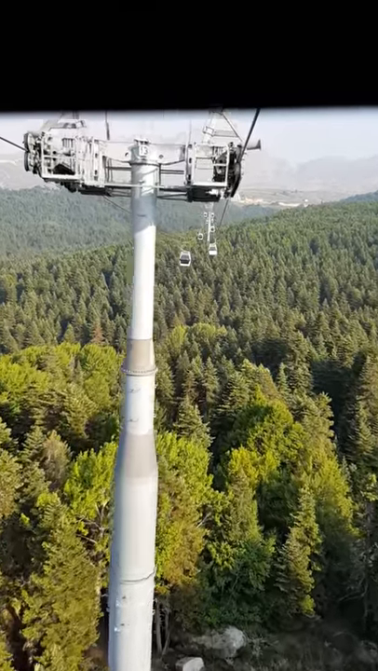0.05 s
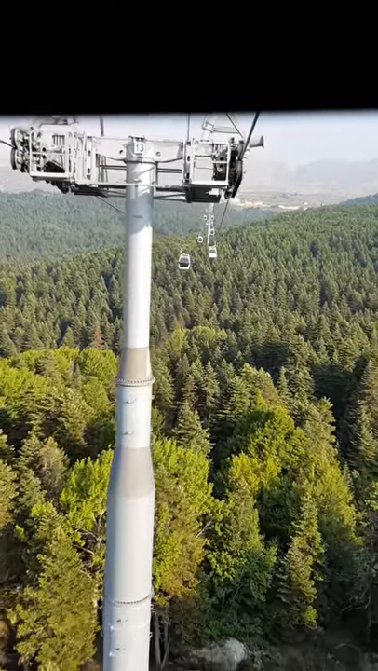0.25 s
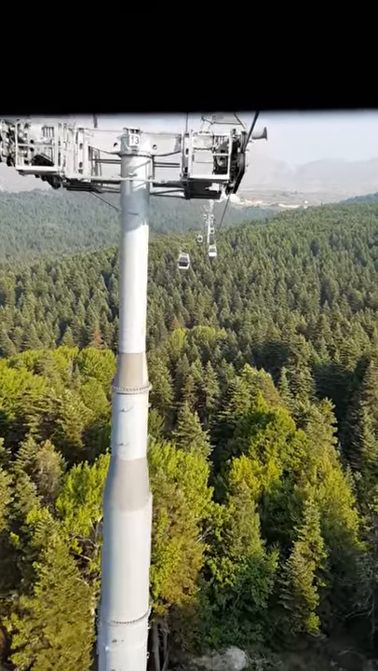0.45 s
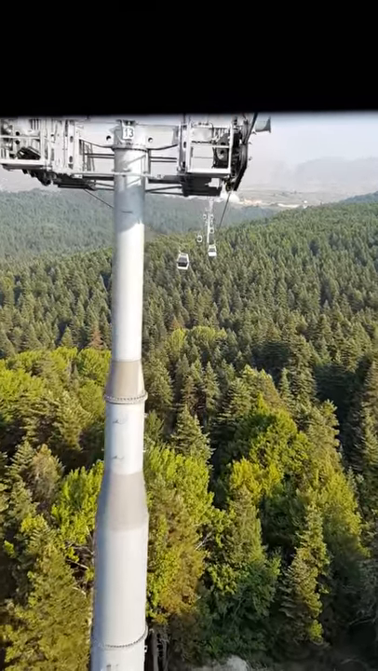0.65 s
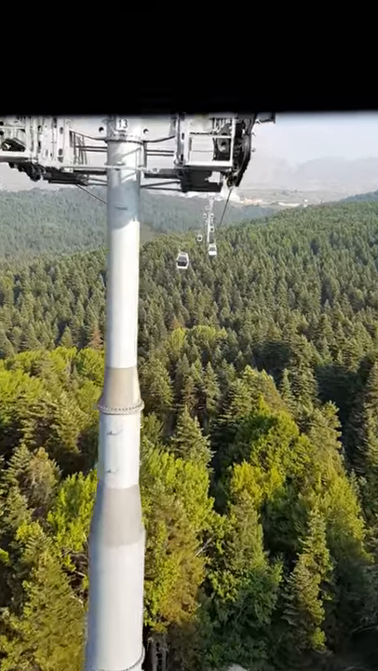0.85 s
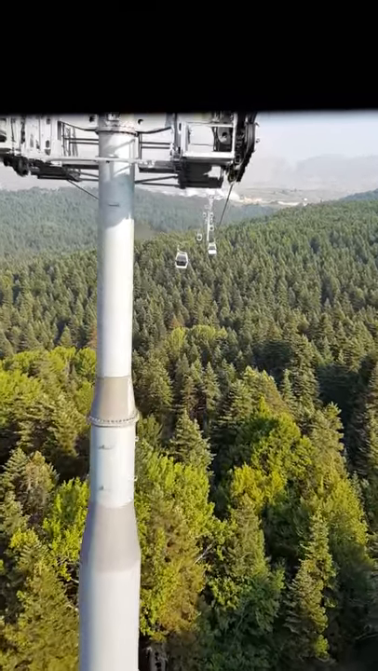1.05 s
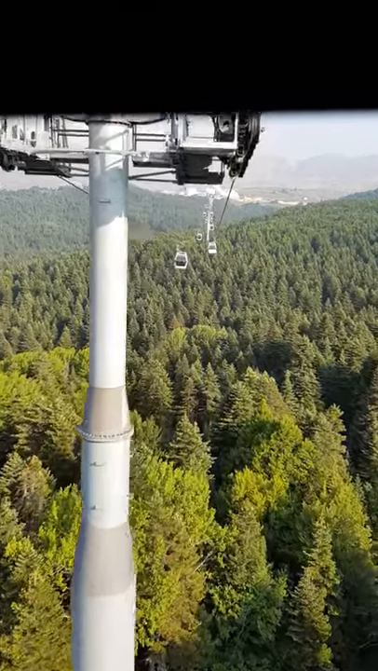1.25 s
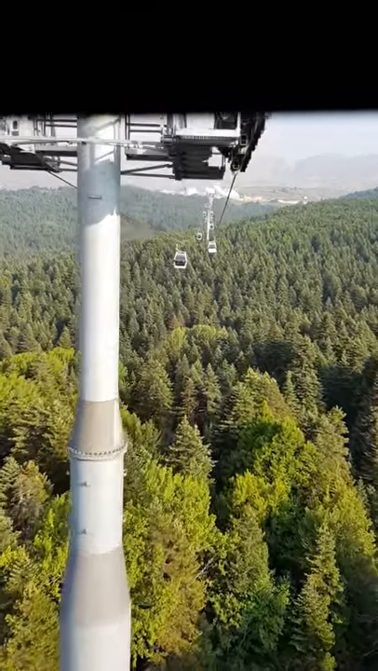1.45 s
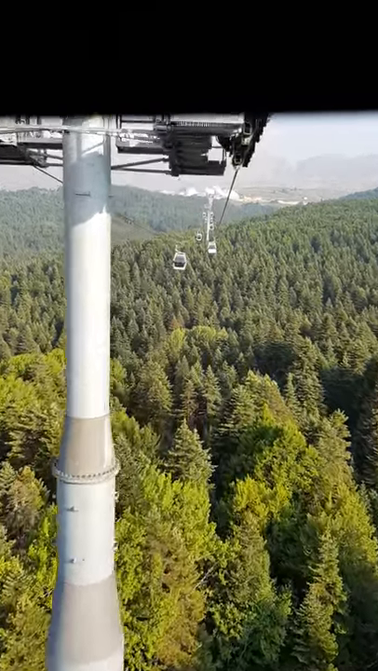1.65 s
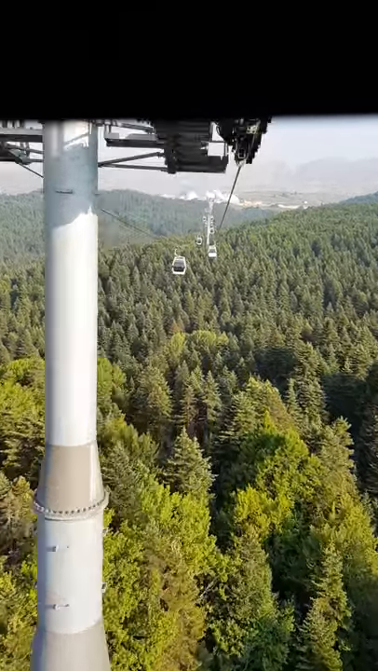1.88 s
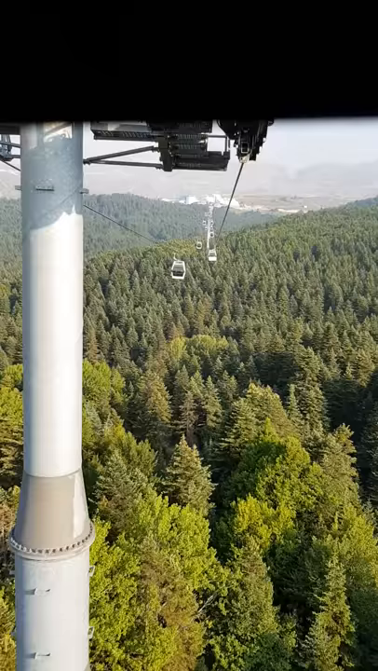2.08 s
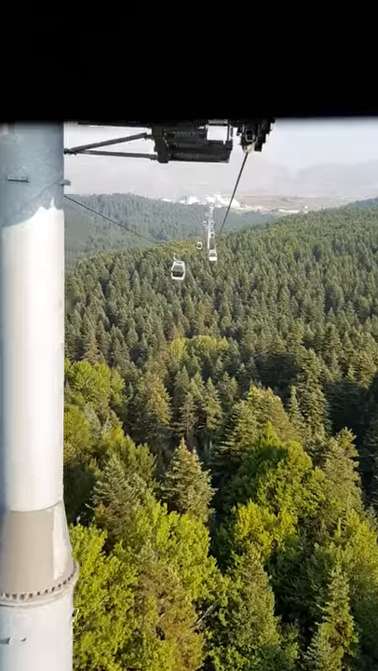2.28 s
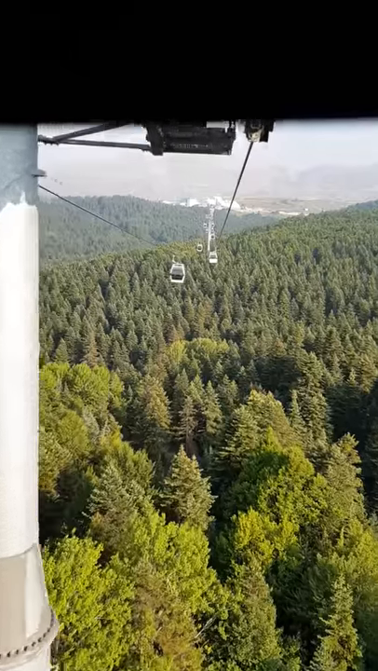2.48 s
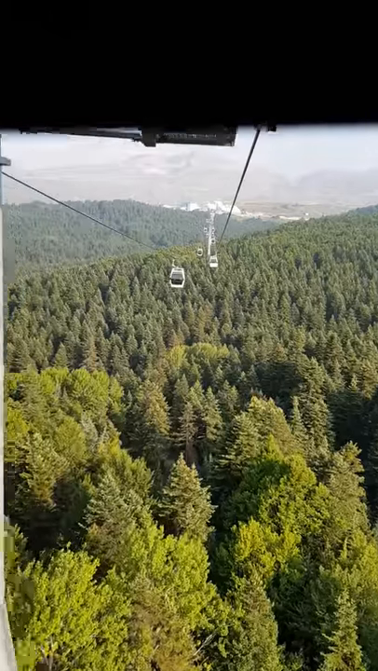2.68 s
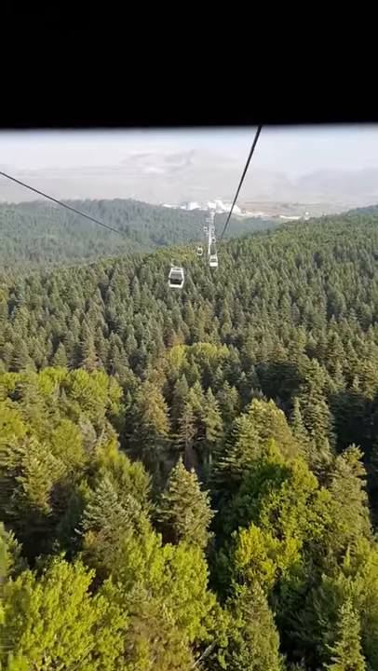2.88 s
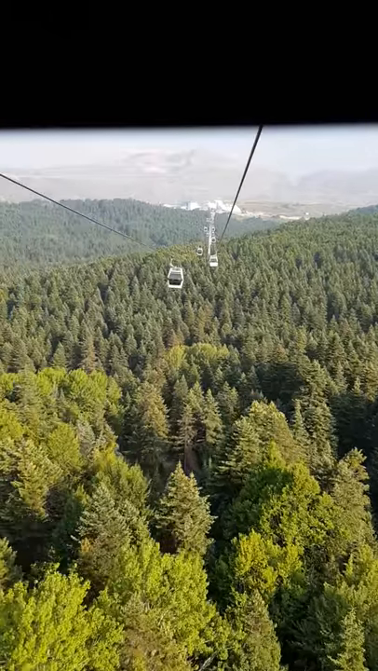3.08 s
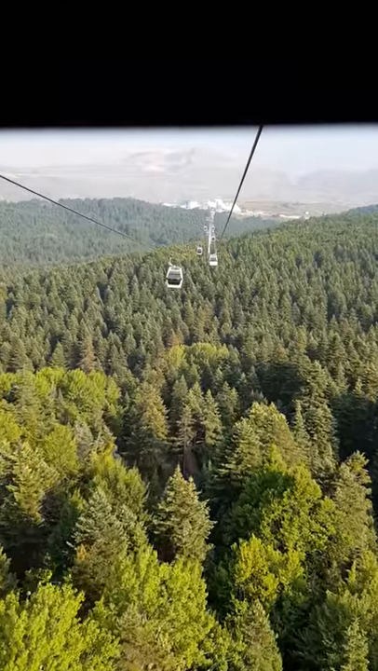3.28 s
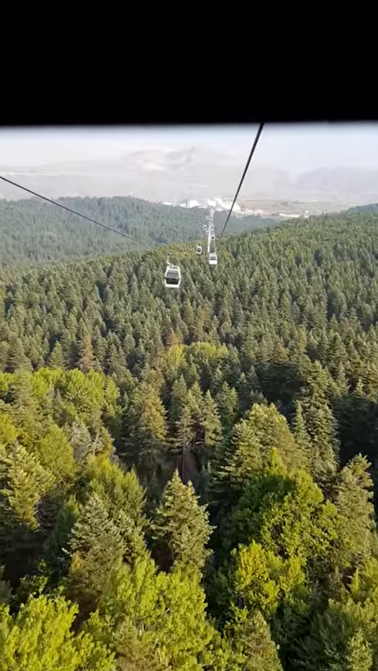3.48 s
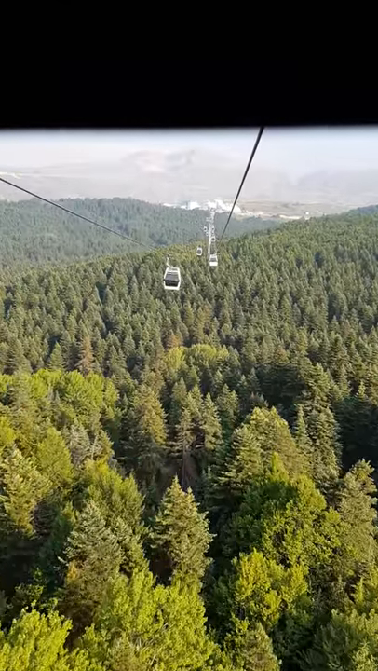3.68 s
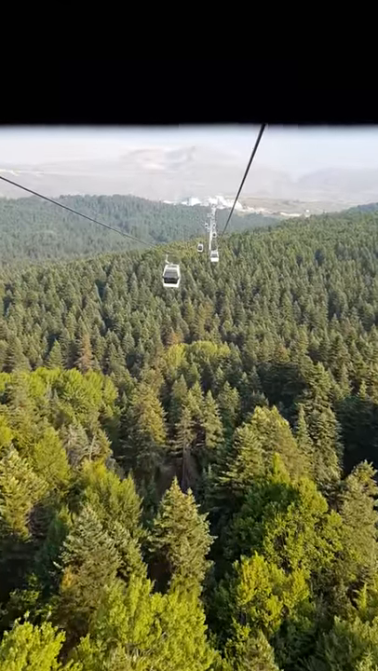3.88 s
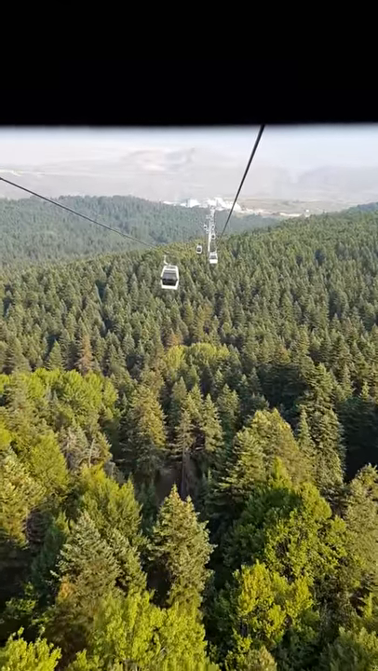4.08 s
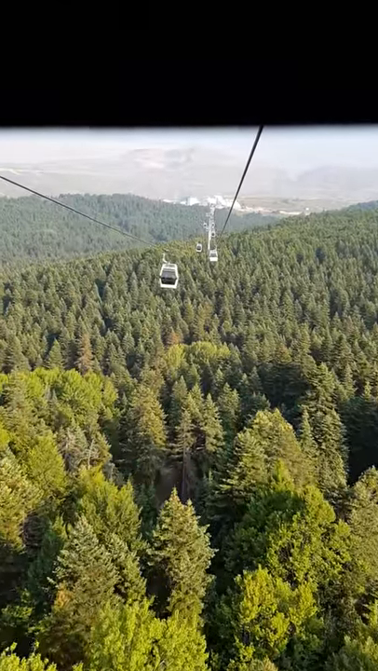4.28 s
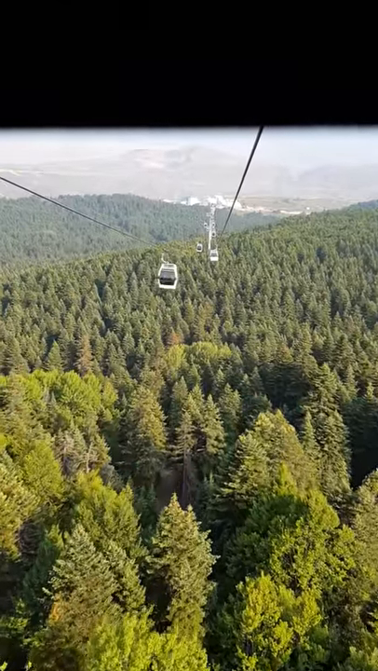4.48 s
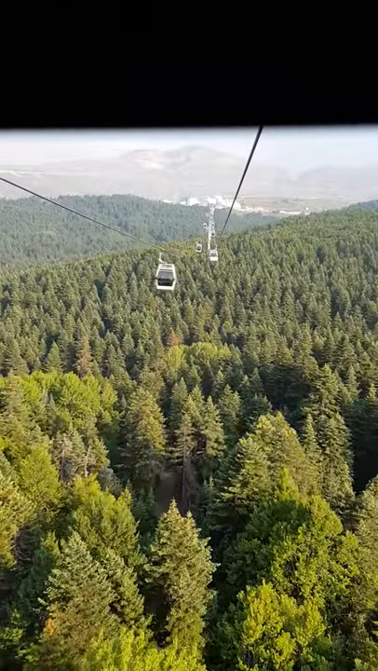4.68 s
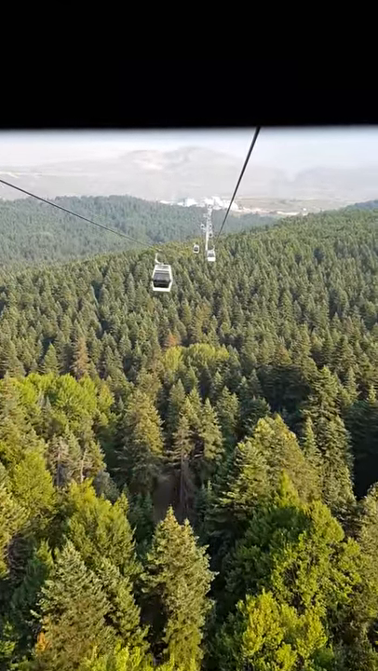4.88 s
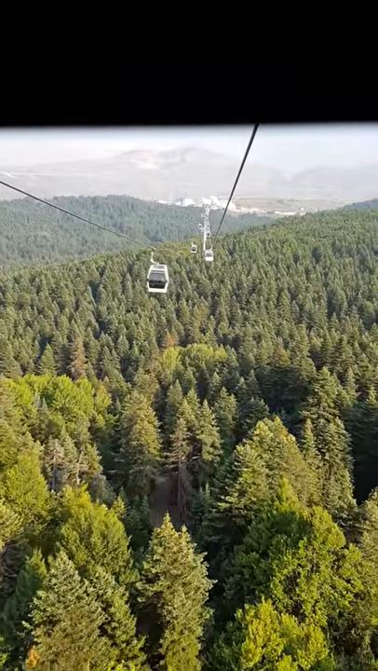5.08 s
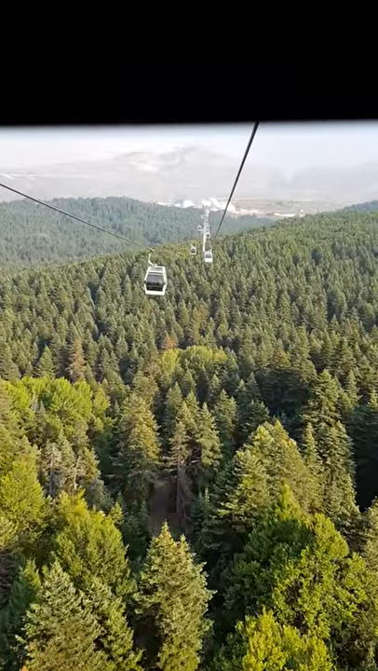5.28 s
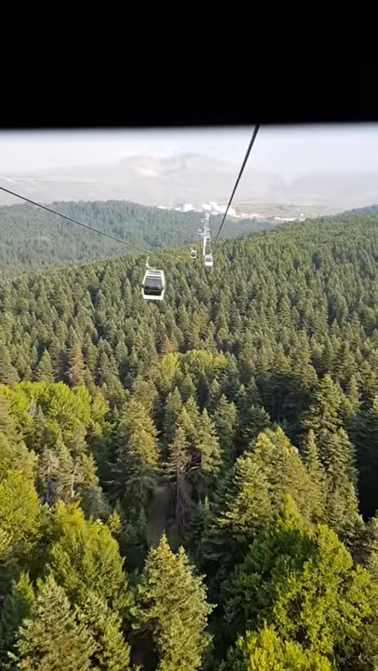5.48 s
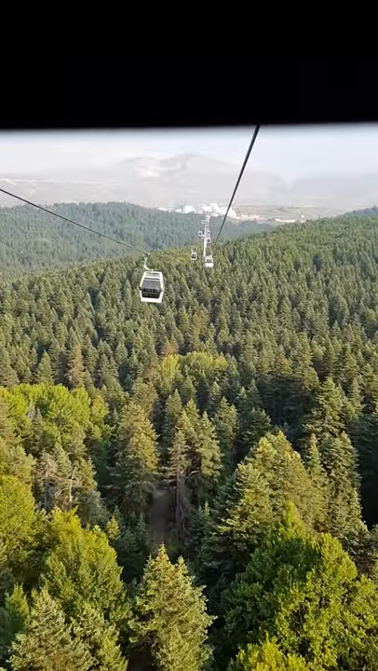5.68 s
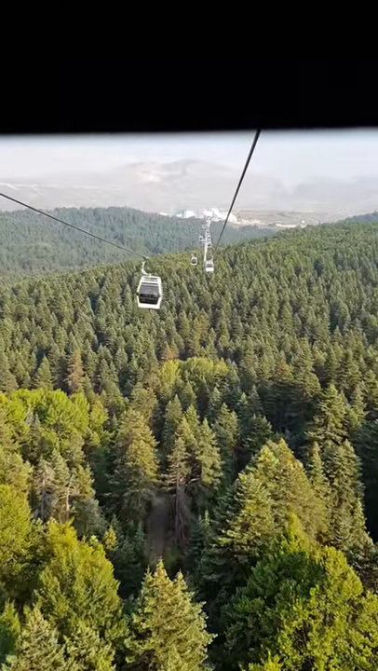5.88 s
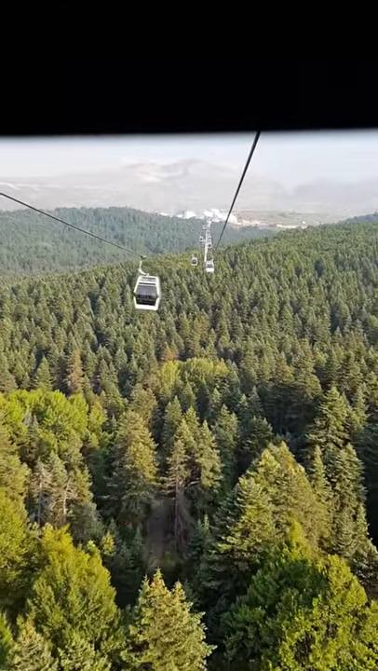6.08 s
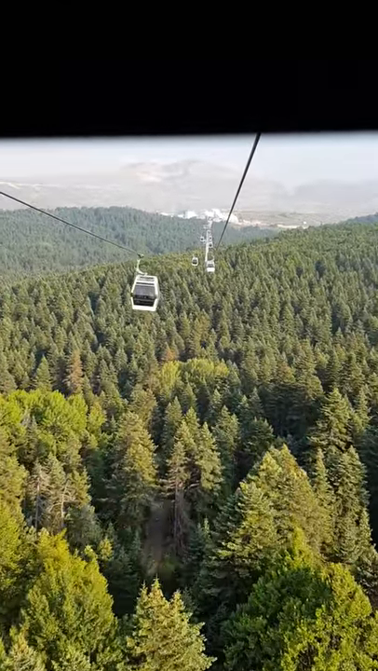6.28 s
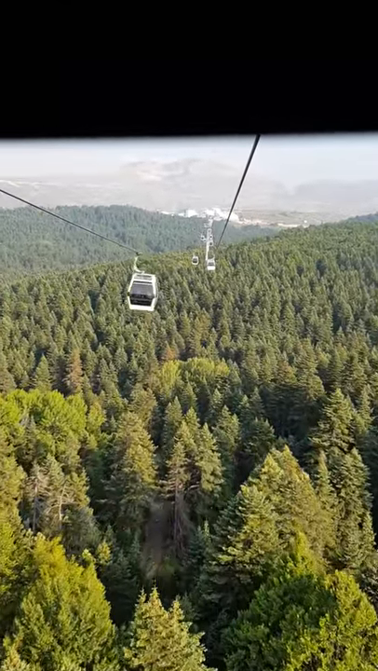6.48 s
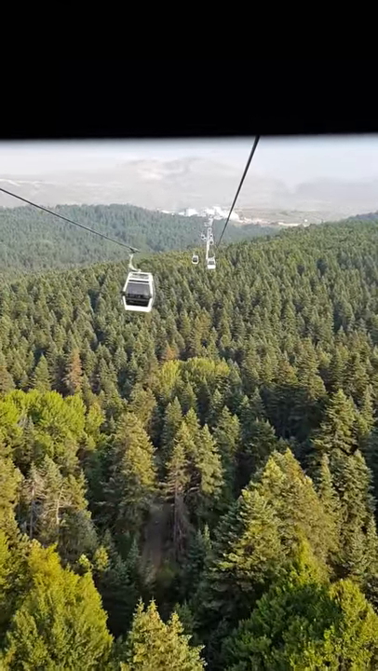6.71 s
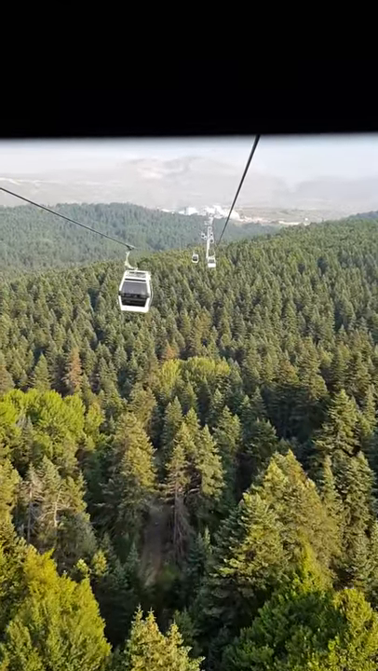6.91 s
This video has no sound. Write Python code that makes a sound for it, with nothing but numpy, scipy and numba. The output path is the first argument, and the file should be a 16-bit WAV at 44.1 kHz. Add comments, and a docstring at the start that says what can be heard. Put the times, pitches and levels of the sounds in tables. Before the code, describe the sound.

A gondola cabin hums toward a support tower, jolts and rattles loudly across the rollers for about a second, then glides on quietly.

```python
"""Cable car riding over a support tower

Inside the cabin, heard by a hand-held phone: the rope hums and the nearing rollers whirr. The grip jolts
across them: pushes ring the shell, small impacts clatter in the frame, fittings rattle, and thin high
tones flicker. Then it grows quiet and a soft rush is left. Noise and pushes through resonances make most
of the sound; the thin tones are wavering sines. The phone's left side lacks bass except now and then."""
import sys
import numpy as np
from scipy import signal
from scipy.fft import rfft, irfft
from scipy.io import wavfile
from scipy.ndimage import uniform_filter1d
from numba import njit

SR = 44100
rng = np.random.default_rng(int(sys.argv[2]) if len(sys.argv) > 2 else 0)


def transcribe(signal):
    """Save signal, clipped to [-1, 1], as a 16-bit WAV file at the path in sys.argv[1]."""
    frames = np.atleast_2d(signal).T
    limited = np.clip(frames, -1, 1)
    pcm = np.round(limited * 32767).astype(np.int16)
    wavfile.write(sys.argv[1], SR, pcm)


N = 306394  # length in samples

# low resonances of the cabin shell: (pitch [Hz], width [Hz], relative level [dB])
SHELL_BOOM = [(48, 20, -8), (65.4, 20, 5), (94.1, 13.7, 5), (111, 14, -12)]
# resonances of the roller wheels: (pitch [Hz], width setting [Hz], relative level [dB])
ROLLER_MODES = [(1719, 266, 2.5), (2160, 620, -3.5), (2849, 315, -3.5), (3403, 340, 1.5),
                (4780, 1000, -4.5)]
# spectrum of the hiss and of the fittings: (frequency [Hz], relative level per Hz [dB])
HISS_COLOUR = [(4500, -3), (6000, -1.5), (7300, -4.5), (8500, -5.5), (11000, -3), (13500, -6), (16000, -9)]

RIGHT_LAG = 19  # samples by which shared sound reaches the right side late
ARRIVES_S, LEAVES_S = 3.37, 4.34  # the grip meets the rollers and leaves them

# shaking: steady level on the rollers, and how fast steady shake and surges fade
BOOM_STEADY_DB, PANEL_STEADY_DB, FRAME_STEADY_DB = -21.5, -30.5, -68
BOOM_FADE_DB_S, PANEL_FADE_DB_S, FRAME_FADE_DB_S = 110, 113, 65
SURGE_RISE_S = 0.018
RUMBLE_DB = -4.5  # gain on the shaken boom
SWING_HZ, SWING_WIDTH_HZ, SWING_DB = 84, 95, 29  # the floor swings under each jolt
THUD_HZ = 323

# beats of the rope's strands: rate, unevenness of gaps (share), scatter of size, level against the rumble
STRANDS_HZ, STRANDS_UNEVEN, STRANDS_SCATTER_DB, STRANDS_DB = 31.7, 0.1487, 1, 0.5

# the whirr falls with distance: base level, time of passing, nearest distance divided by speed
WHIRR_DB, NEAREST_S, CLEARANCE_S = -42, 3.345, 0.69
HISS_DB, HISS_GAIN_DB_S = -60, 0.25  # base level at the start, rise until the grip leaves
WHIRR_FALL_DB_S, HISS_FALL_DB_S = 47, 54  # fall after the grip leaves
GRAIN_DB = 1.2  # whirr and hiss stutter together
# the whirr throbs once a roller turn, ever quicker and flatter; every second throb is stronger
THROB_HZ, THROB_GAIN_HZ_S, THROB_DB, THROB_FLATTENS_S, EVERY_OTHER_DB = 3.754, 0.28, 3.5, 1.26, 1

RATTLE_DB = -20  # against the frame's shaking
BUZZ_RISE_S, BUZZ_FADE_S = 0.0056, 0.017

# the calm rush: base level, when it is reached, rise before that, slow wander, bumps in its rings
CALM_DB, CALM_FROM_S, CALM_RISE_DB_S, CALM_WANDER_DB, CALM_BUMPS_DB = -62.5, 4.6, 30, 0.7, 1.8
SWELL_S, SWELL_TOP_HZ = 0.06, 1570  # short swells in the lower part of the rush

# left side of the phone: bass edge, leak that always passes, flickering trace; top cut on both sides
BASS_EDGE_HZ, BASS_LEAK_HZ, BASS_LEAK_DB = 275, 150, -27
BASS_FLICKER_DB, BASS_FLICKER_SPREAD_DB = -29.5, 6.5
TOP_HZ = 15750


def undb(db):
    """Gain of a level in dB."""
    return 10 ** (np.asarray(db) / 20)


def unit(x):
    """Scale to an rms (average strength) of 1."""
    return x / np.sqrt(np.mean(x ** 2))


def curves(rows):
    """Gains of the dB columns of a table, drawn as straight lines in dB between its times."""
    times, *columns = np.transpose(rows)
    return [undb(np.interp(np.arange(N) / SR, times, column)) for column in columns]


@njit
def svf(x, hz, width):
    """Band-pass filter, like one resonance: it keeps sound near one pitch, with gain 1 at the centre."""
    y, band, low = np.empty(len(x)), 0., 0.
    g, damping = np.tan(np.pi * hz / SR), width / hz
    for i in range(len(x)):
        v = (band + g * (x[i] + 1e-18 - low)) / (1 + g * (g + damping))
        band, low, y[i] = 2 * v - band, low + 2 * g * v, damping * v
    return y


def walk(rate):
    """Smoothly wandering random level with a spread near 1; rate is new values per second."""
    hold = int(SR / rate)
    steps = np.repeat(rng.standard_normal(N // hold + 1), hold)
    return 1.28 * uniform_filter1d(uniform_filter1d(steps, hold), hold)[:N]


def pair(alike, lag=0, size=N):
    """Left and right noise that share a part; the shared part may reach the right side late."""
    common, left, right = rng.standard_normal((3, size))
    alike = np.clip(alike, 0, 1)
    shared = np.array([common, np.roll(common, lag)])
    return np.sqrt(alike) * shared + np.sqrt(1 - alike) * np.array([left, right])


def ring(modes, alike_hz, bumps_db, lag=0):
    """Uneven noise drives each resonance; the two sides hear high ones less alike."""
    out, shared_bumps = 0, walk(30)
    for hz, width, db in modes:
        bumps = bumps_db * (shared_bumps + 1.6 * walk(21.016))
        push = undb(bumps) * pair(1 / (1 + (hz / alike_hz) ** 2), lag)
        band = [svf(svf(side, hz, 1.03 * width), hz, 1.03 * width) for side in push]
        out = out + undb(db) * unit(np.array(band))
    return unit(out)


def coloured(x, points):
    """Shape noise by a spectrum given as points."""
    hz, db = np.transpose(points)
    f = np.arange(N // 2 + 1) * SR / N + 1  # the 1 keeps the logarithm finite
    gain = undb(np.interp(np.log(f), np.log(hz), db))
    return unit(irfft(rfft(x) * gain, N))


def flutter(alike, lag, db):
    """Noise whose half-octave bands flicker each on its own."""
    noise, out = pair(alike, lag), 0
    for hz in 500 * 2 ** np.arange(0, 5.1, .5):
        band = np.array([svf(side, hz, hz / 3) for side in noise])
        out = out + undb(db * walk(22.174)) * band
    return out


def blows(rows, soft_s):
    """One short rounded push for each event; a longer push is softer, with less treble."""
    x = np.zeros(N)
    for s, db, *_ in rows:
        x[int(s * SR)] = undb(db)
    push = np.hanning(int(soft_s * SR) + 3)
    return signal.fftconvolve(x, push / push.sum())[:N]


def thud(s, db, hz, width, alike):
    """A brief rounded noise burst around one pitch; a wider band makes it shorter."""
    n = int(16 * SR / width)
    age = np.arange(n) * width / SR
    burst = pair(alike, size=n) * age * np.exp(-1.5 * age)
    for _ in range(3):
        burst = np.array([svf(side, hz, 1.23 * width) for side in burst])
    out, start = np.zeros((2, N + n)), int(s * SR)
    # db is the peak of the two sides' average
    out[:, start:start + n] = burst * undb(db) / np.abs(burst.mean(axis=0)).max()
    return out[:, :N]


def shell():
    """The rollers shake the shell; each jolt thuds, swings the floor and sets the shell ringing."""
    # grip strikes a roller, later the cabin bounces: (time [s], push strength [dB], thud level [dB])
    jolts = [(3.236, -24, -38), (3.27, -22, -37), (3.305, -14, -36), (3.347, -28, -23), (3.372, -8, -25),
             (3.417, -7, -27), (3.459, -6, -27), (3.473, -14, -15), (3.497, -6, -26), (3.53, -7, -17),
             (3.594, -9, -24), (3.634, -6, -37), (3.682, -9, -30), (3.706, -6, -35), (3.725, -21, -16),
             (3.781, -1, -14), (3.801, -6, -27), (3.82, -9, -25), (3.862, -2, -31), (3.914, -12, -16),
             (3.936, -7, -22), (3.969, -1, -17), (3.988, -9, -28), (4.03, -8, -31), (4.049, -18, -19),
             (4.083, -6, -19), (4.107, -4, -29), (4.149, -3.5, -48), (4.188, -8, -32), (4.214, -6, -19.5),
             (4.238, -8, -26), (4.26, -9, -24), (4.291, -7, -10), (4.315, -9, -21), (4.348, -4, -23.5),
             (4.365, -7, -17), (4.387, -0.5, -24), (4.409, -11, -29), (4.434, -8, -31), (4.473, -8, -42),
             (4.514, -9, -36), (4.545, -10.5, -42), (4.606, -8.5, -38), (4.644, -15, -37),
             (4.687, -14, -48), (4.738, -21, -52), (4.785, -15, -55), (4.838, -18, -56), (4.883, -32, -56),
             (4.968, -27, -61), (5.013, -22, -52), (5.062, -36, -54)]
    # resonances of the shell's panels: (pitch [Hz], width [Hz], relative level [dB])
    shell_panels = [(154.1, 13.4, 0), (190.9, 15.7, -1), (227, 38, -6), (284.8, 30, 0), (321, 100, -4),
                    (408, 112, -4.5), (478, 71, -11), (562, 40, -11), (670, 130, -15), (800, 530, -10)]
    push = blows(jolts, 0.0048)
    rung = sum(undb(db + 25.5) * svf(-push, hz, width) for hz, width, db in [*SHELL_BOOM, *shell_panels])
    swing = undb(SWING_DB) * svf(-blows(jolts, 0.006), SWING_HZ, SWING_WIDTH_HZ)
    thuds = sum(thud(s, db, THUD_HZ, 230, 0.56) for s, _, db in jolts)

    panel_shake = surges(column=2, steady_db=PANEL_STEADY_DB, fade_db_s=PANEL_FADE_DB_S)
    drum = panel_shake * undb(0.79 * walk(70)) * ring(shell_panels, 450, 1.25)
    panels = (drum + thuds) * undb([[0.9], [-0.9]])  # a little louder on the left

    boom_shake = surges(column=1, steady_db=BOOM_STEADY_DB, fade_db_s=BOOM_FADE_DB_S)
    boom = unit(ring(SHELL_BOOM, 160, 0.88) + undb(STRANDS_DB) * strands())
    return undb(RUMBLE_DB) * boom_shake * boom + rung + swing + panels


def surges(column, steady_db, fade_db_s):
    """Gain of one part of the cabin: a steady shake, and surges that rise quickly and fade; powers add."""
    # surges as the grip climbs the rollers and the cabin bounces after:
    # (time [s], boom strength [dB], panel strength [dB], frame strength [dB])
    surge_rows = [(3.229, -22, -28.5, -39.5), (3.363, -19.5, -23, -34), (3.437, -14.5, -17.5, -33),
                  (3.608, -32, -23.5, -39.5), (3.69, -36, -26.5, -38), (3.768, -15, -20.5, -37.5),
                  (3.96, -15.5, -24, -39), (4.02, -22, -22.5, -42), (4.14, -30, -46, -60),
                  (4.293, -15.5, -16, -43), (4.368, -13, -24, -57), (4.47, -18, -38, -62),
                  (4.598, -19.5, -40, -55), (4.7, -44, -48, -54), (4.78, -40, -50.5, -56),
                  (4.88, -58, -52, -60), (4.99, -34, -57, -54.5)]
    t = np.arange(N) / SR

    def rise(s):
        """Quick smooth start at time s."""
        return 1 - np.exp(-np.maximum(t - s, 0) / SURGE_RISE_S)

    steady = undb(steady_db - fade_db_s * np.maximum(t - LEAVES_S, 0)) * rise(ARRIVES_S)
    power = steady ** 2
    for row in surge_rows:
        surge = undb(row[column] - fade_db_s * np.maximum(t - row[0], 0)) * rise(row[0])
        power = power + surge ** 2
    return np.sqrt(power)


def strands():
    """The rope's strands beat unevenly on the rollers and ring the shell's low resonances."""
    chance = rng.standard_normal((int(2 * STRANDS_HZ * N / SR), 2))
    gaps = np.clip(1 + STRANDS_UNEVEN * chance[:, 0], .3, 2) / STRANDS_HZ
    sizes_db = STRANDS_SCATTER_DB * chance[:, 1]
    beats = blows([row for row in zip(np.cumsum(gaps), sizes_db) if row[0] < N / SR], 0.0071)
    return unit(sum(undb(db) * svf(svf(beats, hz, width), hz, hz) for hz, width, db in SHELL_BOOM))


def clatter():
    """Dense small impacts ring the frame; the right side hears them late and mixed with others."""
    # resonances of the frame: (pitch [Hz], width setting [Hz], relative level [dB])
    frame = [(557, 33, -4), (825, 170, 7.5), (963, 250, 7), (1267, 185, 9.5), (1513, 450, 7),
             (2260, 1170, -4), (2845, 87, 3)]
    loud = surges(column=3, steady_db=FRAME_STEADY_DB, fade_db_s=FRAME_FADE_DB_S)
    struck = rng.random((2, N)) < 800 / SR  # about 800 impacts a second
    hits = struck * undb(2.5 * rng.exponential(size=(2, N))) * rng.choice([-1, 1], (2, N))
    sides = hits[0], 0.36 * np.roll(hits[0], RIGHT_LAG) + 1.07 * hits[1]
    rung = [sum(undb(db) * svf(svf(side, hz, width), hz, 1.67 * width) for hz, width, db in frame)
            for side in sides]
    return loud * unit(np.array(rung))


def rollers():
    """Rolling noise that flutters and rings in the wheels, a thin hiss louder on the left, scrapes."""
    # spectrum of the rolling noise: (frequency [Hz], relative level per Hz [dB])
    whirr_colour = [(350, -33), (600, -18), (669, -4.5), (967, -1.5), (1430, -8.5), (1750, -8), (2480, -8),
                    (2920, -5.5), (4000, -14), (8000, -29.5), (10400, -48), (17600, -120)]
    # short scrapes: (time [s], peak level [dB], pitch [Hz], width setting [Hz])
    scrape_rows = [(.515, -47, 2400, 1800), (1.377, -36.5, 1250, 1300), (1.385, -43, 1700, 900),
                   (1.407, -43, 1800, 900), (2.83, -42, 2000, 2000), (3.249, -39, 3700, 1500),
                   (3.814, -29, 650, 500), (3.97, -28, 650, 500)]
    t = np.arange(N) / SR
    past = np.maximum(t - LEAVES_S, 0)
    turns = THROB_HZ * t + THROB_GAIN_HZ_S * t ** 2 / 2
    throb_db = THROB_DB * np.cos(2 * np.pi * turns) + EVERY_OTHER_DB * np.cos(np.pi * turns)
    throb_db = np.exp(-t / THROB_FLATTENS_S) * throb_db
    grain_db = GRAIN_DB * walk(20)
    distance = np.hypot(1, (t - NEAREST_S) / CLEARANCE_S)  # 1 when nearest
    whirr = undb(WHIRR_DB + grain_db + throb_db - WHIRR_FALL_DB_S * past) / distance
    hiss_rise_db = HISS_GAIN_DB_S * np.minimum(t, LEAVES_S)
    hiss = undb(HISS_DB + 0.49 * grain_db + hiss_rise_db - HISS_FALL_DB_S * past)

    broad = undb(1.4 * walk(50)) * coloured(flutter(0.18, RIGHT_LAG, 2.3), whirr_colour)
    wheels = undb(-5) * ring(ROLLER_MODES, 2800, 2.2, RIGHT_LAG) + undb(-4.5) * pings()
    thin = undb(0.5 * walk(25.9)) * coloured(pair(0.13, RIGHT_LAG), HISS_COLOUR) * undb([[2.5], [-2.5]])
    scrapes = sum(thud(s, db, hz, width, 1.0) for s, db, hz, width in scrape_rows)
    return whirr * unit(broad + wheels) + hiss * thin + scrapes


def pings():
    """Wire strands strike the roller flanges at random: short rings scattered around a few pitches."""
    out = 0
    for hz, width, db in ROLLER_MODES[:-1]:
        for shift in (-.4, 0, .4):
            hits = (rng.random(N) < 22 / SR) * undb(2.3 * rng.exponential(size=N))  # about 22 a second
            rung = svf(svf(hits, hz + shift * width, 45.0), hz, 2 * width)
            out = out + undb(db) * np.array([rung, np.roll(rung, RIGHT_LAG)])
    return unit(out)


def thin_tones():
    """Sines whose pitch shivers around a centre; they swell, flicker and fade."""
    # thin wavering tones, most of them short and high:
    # (time [s], length [s], pitch [Hz], width of the shiver [Hz], level before flicker [dB])
    tone_rows = [(.22, .26, 3550, 30, -66), (.46, .14, 3500, 60, -65), (.66, .2, 3550, 40, -67),
                 (2.87, .07, 4650, 200, -60), (2.878, .032, 3520, 30, -46), (2.865, .12, 6000, 260, -62),
                 (2.992, .014, 5950, 150, -55), (3.022, .13, 5960, 180, -59), (3.13, .09, 6030, 260, -58),
                 (3.162, .014, 5950, 200, -55), (3.16, .04, 3500, 40, -55), (3.16, .04, 9700, 700, -66),
                 (2.88, .07, 9900, 300, -70), (2.99, .03, 9800, 300, -68), (3.36, .22, 11800, 1600, -64),
                 (3.96, .14, 10300, 500, -63), (4.0, .1, 12400, 1400, -61), (4.28, .13, 12200, 1200, -62),
                 (4.6, 1.4, 9600, 500, -88), (6.62, .17, 3110, 50, -70)]
    out, t = 0, np.arange(N) / SR
    for s, length, hz, width, db in tone_rows:
        swell, fade = (t - s) / (0.1 * length), (s + length - t) / (0.2 * length)
        on = np.clip(np.minimum(swell, fade), 0, 1)
        phase = 2 * np.pi * np.cumsum(hz + width / 2 * walk(3 * width)) / SR
        tone = np.sin(phase + np.array([[0], [0.8]]))  # the right side runs slightly ahead
        out = out + undb(db + 2.2 * walk(80)) * on * tone
    return out


def fittings():
    """Noise in three shapes: sharp-edged ticks, buzzes that swell and fizz out, a rattle with the frame."""
    # loose fittings tick: (time [s], starting strength [dB])
    tick_rows = [(3.2734, -52), (3.4825, -55), (3.6103, -40), (3.717, -45), (3.7369, -46), (4.1768, -50),
                 (4.2994, -51), (4.349, -42), (4.516, -51), (4.64, -66), (4.865, -62), (5.28, -65),
                 (5.56, -63)]
    # loose fittings buzz for a moment: (time [s], strength before rise and fade [dB])
    buzz_rows = [(1.22, -51), (3.36, -51), (3.444, -48), (3.52, -46), (3.61, -49), (3.688, -52),
                 (3.72, -54), (3.74, -43.5), (3.96, -49), (4.06, -54), (4.177, -63), (4.26, -50),
                 (4.349, -45.5)]
    t = np.arange(N) / SR
    frame_shake = surges(column=3, steady_db=FRAME_STEADY_DB, fade_db_s=FRAME_FADE_DB_S)
    shape = frame_shake * undb(RATTLE_DB + 3.0 * walk(60))
    for s, db in tick_rows:
        shape = shape + (t >= s) * undb(db) * np.exp(-np.maximum(t - s, 0) / 0.0038)
    for s, db in buzz_rows:
        age = np.maximum(t - s, 0)
        shape = shape + undb(db) * np.exp(-age / BUZZ_FADE_S) * (1 - np.exp(-age / BUZZ_RISE_S))
    return shape * coloured(pair(0.095), HISS_COLOUR)


def rope_hum():
    """Strand rumble in the cabin's air and panels, with small knocks; the panels sound nearer the left."""
    # hum carried down the hanger: (time [s], boom level [dB], panel level before left-right tilt [dB])
    hum = [(0.0, -40, -46), (.2, -47, -51), (.5, -40, -47), (.62, -48, -49), (.8, -44, -47.5),
           (1.14, -46, -47.5), (1.3, -42.5, -46.5), (1.5, -38, -46), (1.62, -47, -45), (1.9, -45.5, -49.5),
           (2.3, -39, -43), (2.55, -39, -45), (2.63, -38, -40.5), (3.03, -42.5, -45.5), (3.13, -31, -36),
           (3.25, -40.5, -47.5), (5.1, -50, -55), (5.45, -53.5, -55.5), (5.62, -46.5, -55),
           (5.9, -48.5, -57), (5.99, -58.5, -54), (6.43, -55.5, -57.5), (6.6, -51, -55), (6.7, -50.5, -55),
           (6.95, -51.5, -54)]
    # small knocks down the rope: (time [s], peak level before left-right tilt [dB])
    knock_rows = [(0.39, -37.5), (0.5, -38), (1.153, -40.5), (1.225, -35.5), (1.376, -41), (1.9, -40.5),
                  (1.942, -40), (2.134, -37), (2.289, -36.5), (2.594, -36.5), (2.951, -34), (6.738, -43)]
    # resonances of the air, then of the panels: (pitch [Hz], width setting [Hz], relative level [dB])
    hum_boom = [(44.2, 9.1, -3.5), (82.5, 30, 0.5), (117, 17, -13)]
    hum_panels = [(156.3, 28, -4.5), (235.3, 64, -1.5), (305.7, 90, -2), (398, 162, -1), (537, 215, -7)]
    boom, drone = curves(hum)
    knocks = sum(thud(s, db, 375, 320, 0.19) for s, db in knock_rows)
    panels = (drone * ring(hum_panels, 174, 0.97) + knocks) * undb([[1.3], [-1.3]])
    return boom * ring(hum_boom, 330, 0.89) + panels


def calm():
    """A soft grainy rush of flickering noise that takes over as the rollers fall behind."""
    # spectrum of the rush: (frequency [Hz], relative level per Hz [dB])
    calm_colour = [(350, -56), (600, -7), (856, -5.5), (1070, -13), (1150, -3.5), (1350, -16.5),
                   (1680, -15), (2030, -13.5), (2510, -11), (3200, -10.5), (3910, -20), (4570, -13.5),
                   (8500, -31), (11000, -55), (18700, -120)]
    # resonances in the rush: (pitch [Hz], width setting [Hz], relative level [dB])
    calm_rings = [(1763, 110, -8), (2850, 770, 2.5), (3180, 310, -9.5), (4450, 420, -24)]
    # faint high air that comes in late: (time [s], level before the 8 dB lift below [dB])
    high_air = [(4.7, -102), (4.93, -90), (5.63, -86.5), (6.05, -84.5), (6.9, -82.5)]
    # spectrum of the high air: (frequency [Hz], relative level per Hz [dB])
    high_air_colour = [(7500, -39), (9300, 0.5), (12000, -4), (16000, -2)]
    # the lower part of the rush swells briefly: (time [s], gain [dB])
    swells = [(5.06, 7), (5.61, 10)]
    t = np.arange(N) / SR
    wait = np.maximum(CALM_FROM_S - t, 0)
    rush = undb(CALM_DB - CALM_RISE_DB_S * wait + CALM_WANDER_DB * walk(14))

    air = coloured(flutter(0.16, 1, 2.7), calm_colour)
    swell_db = sum(db * np.exp(-((t - s) / SWELL_S) ** 2) for s, db in swells)
    lower = signal.sosfilt(signal.butter(2, SWELL_TOP_HZ, fs=SR, output="sos"), air)
    air = air + (undb(swell_db) - 1) * lower
    rings = undb(-6.0) * ring(calm_rings, 3000, CALM_BUMPS_DB, 3)

    high, = curves([(4.4, -100), *high_air])
    top = undb(8.0 + 0.9 * walk(20)) * coloured(pair(0.078), high_air_colour)
    return rush * unit(air + rings) + high * top


def scene():
    """Everything heard in the cabin."""
    return shell() + clatter() + rollers() + thin_tones() + fittings() + rope_hum() + calm()


def record(dry):
    """The left bass comes and goes in short spells, a trace of it always leaks; the top is cut."""
    # the left side lets bass through: (time [s], length [s], bass gain [dB])
    bass_open = [(0.272, 0.027, -6), (0.994, 0.034, -7), (1.257, 0.1, -19), (1.457, 0.058, -10),
                 (2.154, 0.14, -8.5), (2.348, 0.12, -8), (2.584, 0.064, -5.5), (3.264, 0.059, -7),
                 (3.34, 1.57, 1.5), (4.974, 0.087, -5.5), (5.147, .03, -11)]
    share = undb(BASS_FLICKER_DB + BASS_FLICKER_SPREAD_DB * walk(40))
    for s, length, db in bass_open:
        share[int(s * SR):int((s + length) * SR)] = undb(db)
    share = uniform_filter1d(share, size=400)  # soften the edges of the spells

    upper = signal.sosfiltfilt(signal.butter(6, BASS_EDGE_HZ, "high", fs=SR, output="sos"), dry[0])
    bass = dry[0] - upper
    leak = undb(BASS_LEAK_DB) * svf(svf(bass, BASS_LEAK_HZ, 120.), BASS_LEAK_HZ, 120.)
    left = upper + share * bass + leak
    top_cut = signal.ellip(14, .2, 70, TOP_HZ, fs=SR, output="sos")
    return signal.sosfilt(top_cut, np.array([left, dry[1]]))


dry = scene()
out = record(dry)
transcribe(out)
```